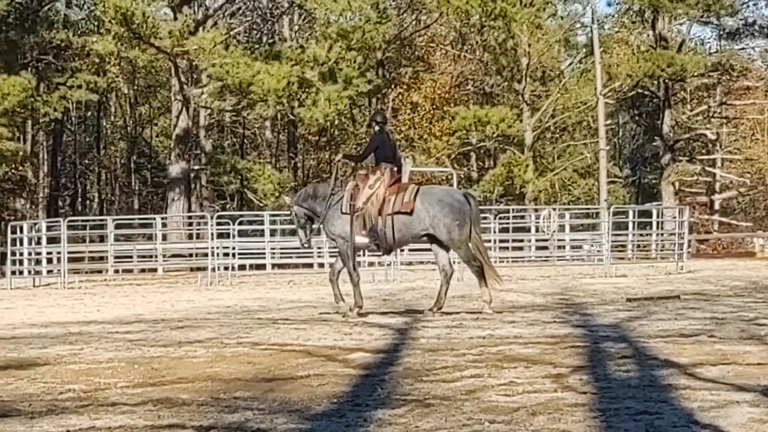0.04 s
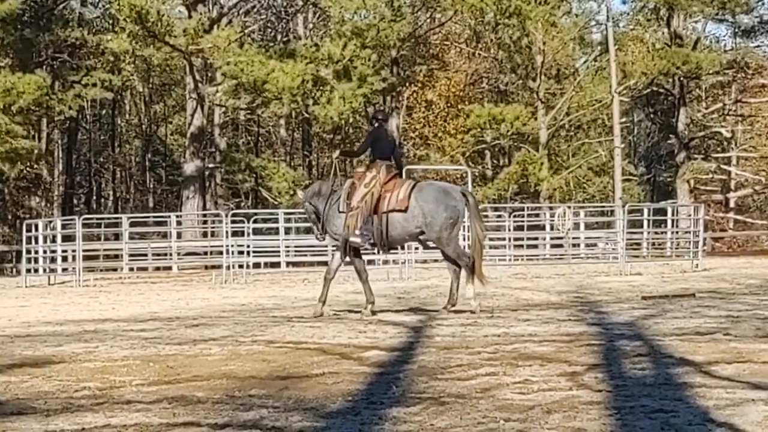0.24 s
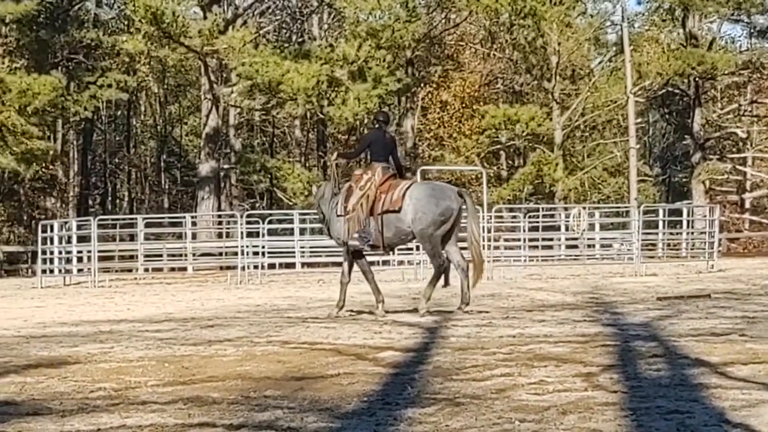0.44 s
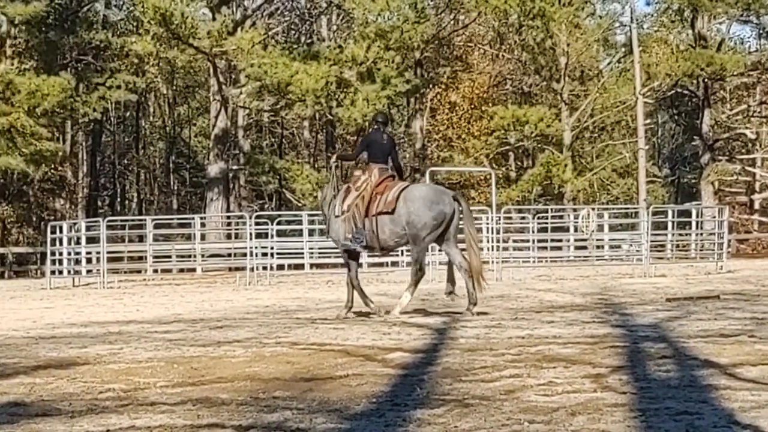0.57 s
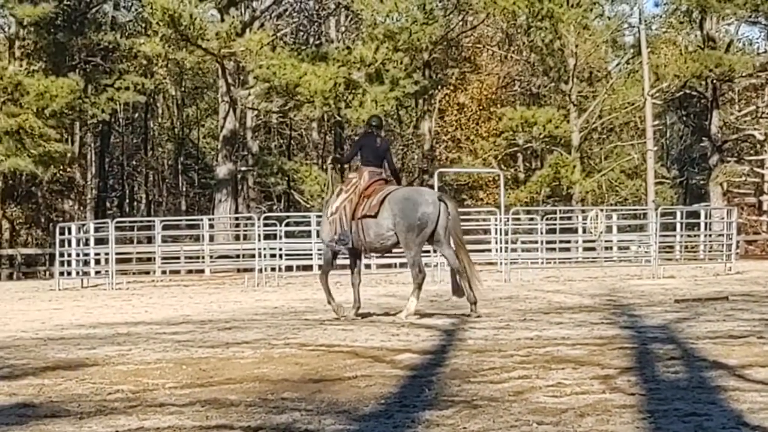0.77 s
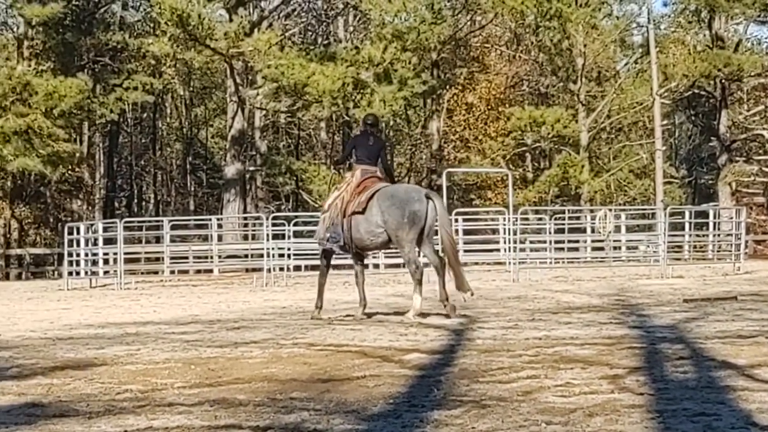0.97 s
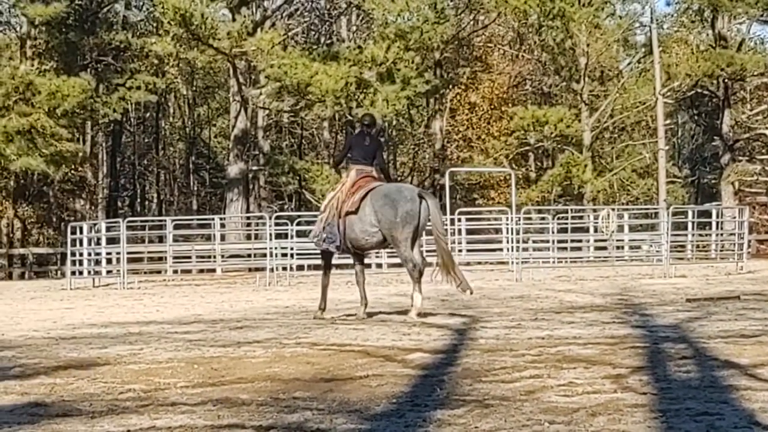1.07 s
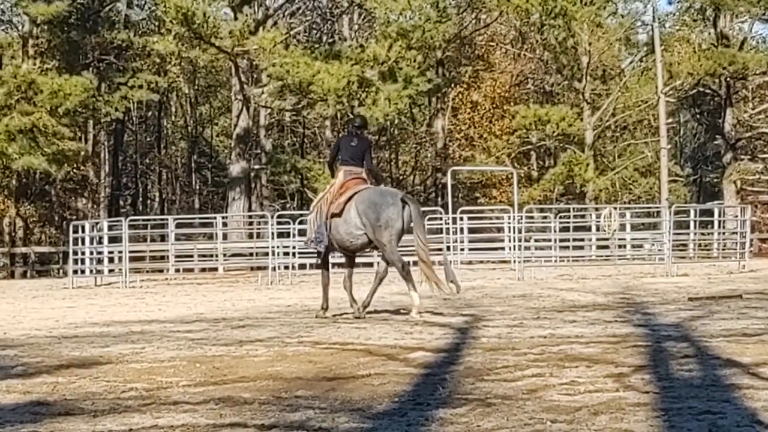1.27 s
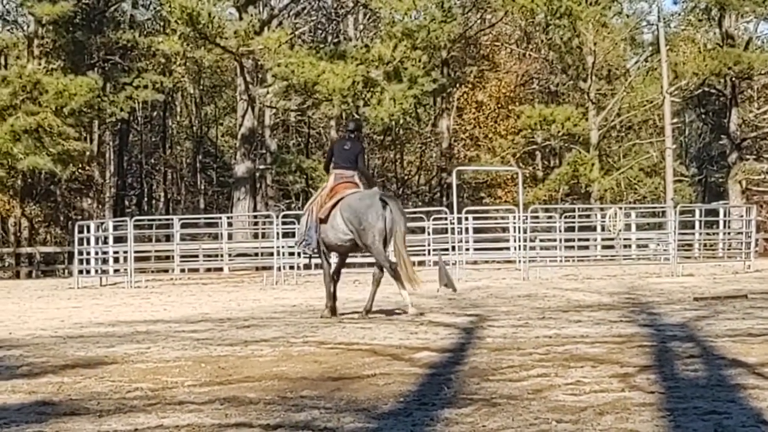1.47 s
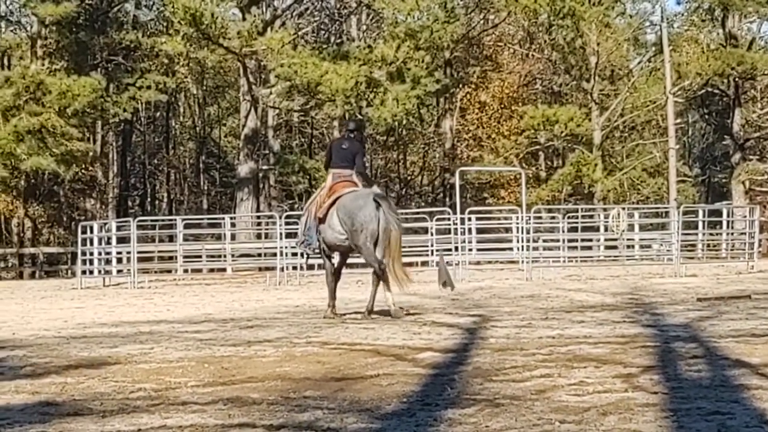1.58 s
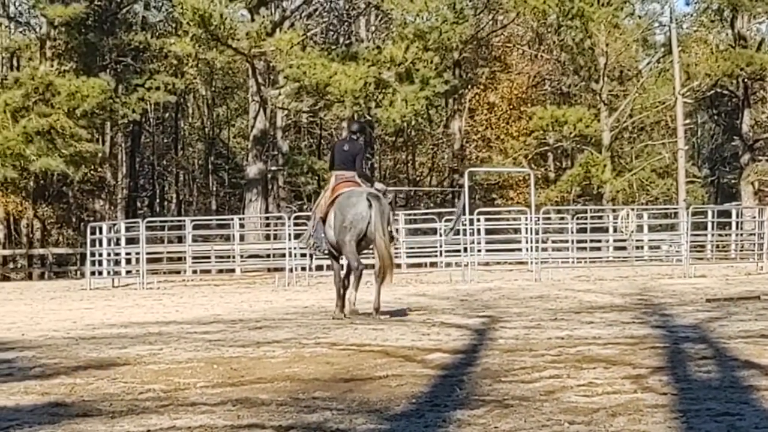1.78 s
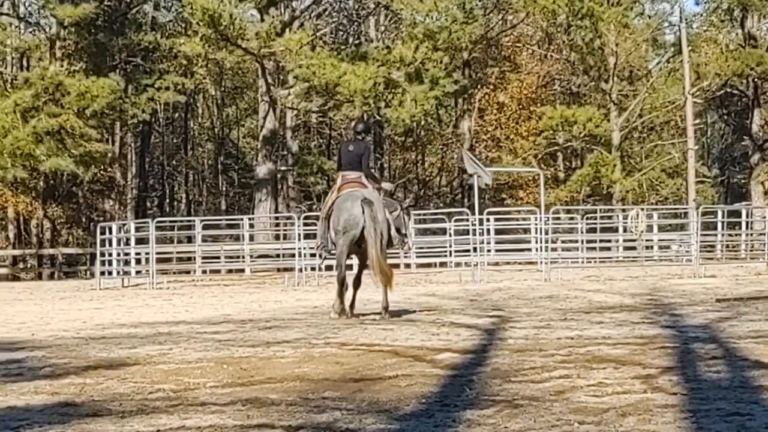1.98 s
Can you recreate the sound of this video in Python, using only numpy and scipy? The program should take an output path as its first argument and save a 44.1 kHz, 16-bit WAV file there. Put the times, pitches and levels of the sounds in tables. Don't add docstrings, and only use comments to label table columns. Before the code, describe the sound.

Low wind buffeting thumps the left microphone while a distant engine drones past, sinking in pitch.

```python
import sys
import numpy as np
from scipy import signal
from scipy.fft import rfft, irfft
from scipy.io import wavfile
from scipy.ndimage import uniform_filter1d

SR = 44100
rng = np.random.default_rng(int(sys.argv[2]) if len(sys.argv) > 2 else 0)


def to_wav(sig):
    pcm = np.clip(np.atleast_2d(sig), -1, 1) * 32767
    pcm = np.round(pcm).astype(np.int16)
    wavfile.write(sys.argv[1], SR, pcm.T)


def convert_level_to_amplitude(level_db):
    exponent = np.asarray(level_db, float) / 20
    return 10 ** exponent


N = 89478
T = np.arange(N) / SR

# t/s, length/s, level/dB, centre f/Hz
EDDIES = [(0.062, 0.036, -49, 111), (0.1, 0.032, -39.0, 113), (0.13, 0.023, -40.5, 156),
          (0.19, 0.034, -41, 142), (0.225, 0.034, -47, 148), (0.265, 0.043, -40.5, 99),
          (0.495, 0.04, -39, 141), (0.575, 0.12, -52.5, 92), (0.67, 0.055, -48.5, 111),
          (0.751, 0.015, -43.5, 121), (0.862, 0.04, -36.5, 123.9), (0.92, 0.039, -34.5, 147),
          (0.96, 0.022, -32, 130), (1.003, 0.047, -42.5, 116), (1.066, 0.034, -45.5, 129),
          (1.108, 0.033, -39, 118), (1.173, 0.048, -38.5, 127), (1.33, 0.025, -43, 124),
          (1.355, 0.026, -37, 90.84), (1.435, 0.04, -44.6, 120), (1.475, 0.088, -52.5, 114),
          (1.536, 0.025, -30.5, 128), (1.571, 0.034, -39, 98), (1.628, 0.037, -43.5, 113),
          (1.7, 0.069, -48, 116.2), (1.774, 0.022, -44, 121.9)]
# t/s, f/Hz, level/dB
ENGINE_NOTE = [(0, 179.3, -59), (.13, 176.3, -58.5), (0.209, 178.7, -53.5), (0.299, 177.2, -60.5),
               (.56, 175, -64.5), (.77, 174.3, -56), (0.918, 170, -59), (1.05, 168.9, -46),
               (1.14, 167, -59), (1.208, 164.2, -45.5), (1.3, 163.3, -60), (1.361, 164.7, -46),
               (1.409, 163.5, -56), (1.488, 163.2, -50.5), (1.581, 161.9, -56.5), (1.64, 162.4, -62.5),
               (1.85, 157, -68), (2.03, 158, -68)]
# f/Hz, density/dB
ROAR_SPECTRUM = [(130, 10.5), (250, -9), (400, -8.5), (650, -4), (1100, -7.5), (1600, -11), (2300, -19),
                 (4000, -36.5)]
# t/s, level/dB
AIR_CARRY = [(0, -0.5), (.35, 0.5), (.8, -1), (1.0, 2.5), (1.2, 0.5), (1.5, -0.1), (1.75, -1.5),
             (2.03, -2.5)]
# f/Hz, level/dB, t60/s, delay/s
BUCKLE_MODES = [(2300, -6, .011, .001), (3300, -10, .008, .0015), (4100, -5, .013, .0012),
                (5400, -10, .006, .001), (6900, -1, .006, 0), (8800, -12, .006, 0), (10400, 1, .007, 0),
                (11800, -5, .01, .0003)]
# t/s, thud level/dB, thud f/Hz, snap level/dB
HOOF_KNOCKS = [
    (.8755, -46, 280, -70),
    (1.3690, -43, 210, -43.5),
]
# t/s, length/s, level/dB
SAND_SWISHES = [
    (.02, .03, -80),
    (.255, .04, -80),
    (.43, .06, -77),
    (.54, .03, -81),
    (1.7, .03, -81),
]
# f/Hz, density/dB
LEFT_HISS = [(1500, -4), (2400, -3), (3700, 2), (4600, -1.5), (6000, 2.4), (7200, -4), (8500, -10.5),
             (13000, -16)]
# f/Hz, density/dB
RIGHT_HISS = [(2000, -25.5), (3300, -5.5), (4200, -7), (5800, -10), (7500, -10.5), (9000, -2.5),
              (11000, -9), (13500, -14)]

EVENNESS = 0.6


def ports(left_db, right_db):
    return convert_level_to_amplitude(np.array([[left_db], [right_db]]))


def rms_one(x):
    return x / np.sqrt(np.mean(x ** 2, axis=-1, keepdims=True) + 1e-20)


def drift(rate_hz):
    r = np.exp(-80 * np.pi * rate_hz / SR)
    slow = signal.lfilter([1], [1, -2 * r, r * r], rng.standard_normal(N // 40 + 2002))[2000:]
    return np.interp(np.arange(N) / 40, np.arange(len(slow)), rms_one(slow - slow.mean()))


def cut(x, hz, kind, order=2):
    return signal.sosfilt(signal.butter(order, hz, kind, fs=SR, output="sos"), x)


def click(s, db):
    return convert_level_to_amplitude(db) * (np.arange(N) == int(s * SR))


def ring(clicks, hz, t60):
    r, w = convert_level_to_amplitude(-60 / (t60 * SR)), 2 * np.pi * hz / SR
    return signal.lfilter([0, np.sin(w)], [1, -2 * r * np.cos(w), r * r], clicks + 1e-18)


def coloured(x, spectrum):
    hz, db = np.transpose(spectrum)
    grid = np.fft.rfftfreq(N, 1 / SR) + 1
    skirt = np.minimum(grid / hz[0], 1) ** 2
    shape = convert_level_to_amplitude(np.interp(np.log(grid), np.log(hz), db))
    return rms_one(irfft(rfft(x) * skirt * shape, N))


def lagged(x):
    return np.interp(T - 0.00039, T, x)


def scattered(x, t60):
    t = T[:SR // 3]
    sparse = rng.standard_normal((2, len(t))) * (rng.random((2, len(t))) < 0.05)
    taps = sparse * convert_level_to_amplitude(-60 * t / t60) * (t > 0.004)
    taps = taps / np.sqrt(np.sum(taps ** 2, axis=1, keepdims=True))
    return signal.fftconvolve(x[None], taps, axes=1)[:, :N]


def eddy(noise, s, length, db, hz):
    spread, body_top_hz, tail_top_hz = 0.32, 226, 400
    grid = np.fft.rfftfreq(len(noise), 1 / SR) + 1
    body = np.exp(-np.log(grid / hz) ** 2 / (4 * spread ** 2)) / (1 + (grid / body_top_hz) ** 6)
    tail = convert_level_to_amplitude(-33 + 0.56 * (db + 39.5)) / (1 + (grid / tail_top_hz) ** 4)
    x = rms_one(irfft(rfft(noise) * (body + tail), len(noise)))
    x = x / (uniform_filter1d(x ** 2, size=700) + 0.05) ** (EVENNESS / 2)
    swell = np.exp(-((np.arange(len(x)) - len(x) / 2) / (0.58 * length * SR)) ** 4)
    level = convert_level_to_amplitude(db) * np.sqrt(np.sum(swell ** 2) / np.sum((swell * x) ** 2))
    out = np.zeros(N + 2 * len(x))
    start = int(s * SR) + len(x) // 2
    out[start:start + len(x)] = level * swell * x
    return out[len(x):len(x) + N]


def turbulence(low_hz, high_hz):
    x = rms_one(cut(rng.standard_normal(N + SR), [low_hz, high_hz], "band")[SR:])
    return rms_one(x / (uniform_filter1d(x ** 2, size=900) + 0.05) ** (EVENNESS / 2))


def wind():
    noises = rng.standard_normal((len(EDDIES), 8192))
    eddies = sum(eddy(noise, *row) for noise, row in zip(noises, EDDIES))
    gust = (rms_one(uniform_filter1d(np.abs(eddies), size=16000)) + 0.3) ** 0.2
    breeze = [gust * convert_level_to_amplitude(db + 1.2 * drift(3.5)) * turbulence(73.6, 184) for db in (-59.5, -62.5)]
    both = eddies * ports(0, -36) + breeze
    return cut(cut(both, 600, "low"), 42, "high", order=3)


def engine_note():
    s, hz, db = np.transpose(ENGINE_NOTE)
    pitch_hz = np.interp(T, s, hz) + 0.8 * drift(12.9)
    phase = 2 * np.pi * np.cumsum(pitch_hz) / SR
    level = np.sqrt(2) * convert_level_to_amplitude(np.interp(T, s, db) + 0.7 * drift(18.0))
    octave = convert_level_to_amplitude(-28 + 2.4 * drift(6.9)) * np.sin(2 * phase)
    return level * (np.sin(phase) + octave)


def engine_roar():
    alike = 0.51
    shared, left, right = coloured(rng.standard_normal((3, N)), ROAR_SPECTRUM)
    common = np.array([shared, lagged(shared)])
    roar = np.sqrt(alike) * common + np.sqrt(1 - alike) * np.array([left, right])
    carry_db = np.interp(T, *np.transpose(AIR_CARRY))
    dull = cut(roar, 2500, "low", order=1)
    roar = dull + (roar - dull) * convert_level_to_amplitude(2.19 * carry_db)
    return roar * convert_level_to_amplitude(-66.5 + carry_db + 0.6 * drift(21.0))


def engine():
    note = engine_note()
    return engine_roar() + [note * convert_level_to_amplitude(-0.04), lagged(note)]


def bird():
    start_s, length_s, bend_s = 0.765, 0.023, 0.0095
    from_hz, to_hz = 5800, 8600
    t = np.clip(T - start_s, 0, length_s)
    hz = to_hz - (to_hz - from_hz) * np.exp(-t / bend_s)
    swell = np.sin(np.pi * (t / length_s) ** 0.75) ** 2
    chip = swell * np.sin(2 * np.pi * np.cumsum(hz) / SR)
    ground = convert_level_to_amplitude(-5) * np.roll(chip, int(0.0055 * SR))
    trees = ports(-7, -4) * scattered(chip, t60=0.65)
    return ports(-63.5, -61) * (chip + ground + trees)


def tack():
    tick = sum(ring(click(0.1424 + late, db), hz, t60) for hz, db, t60, late in BUCKLE_MODES)
    tick = cut(tick, 12500, "low", order=4)
    scatter = convert_level_to_amplitude(-1) * scattered(cut(tick, 8000, "high"), t60=0.13)
    return ports(-58, -55.5) * (tick + scatter)


def knocks():
    thud_t60, snap_hz, snap_t60 = 0.03, 1450, 0.0018
    out = np.zeros(N)
    for s, thud_db, thud_hz, snap_db in HOOF_KNOCKS:
        out -= ring(click(s, thud_db), thud_hz, thud_t60)
        dip = click(s - 0.0004, snap_db) - click(s - 0.0008, snap_db - 3)
        out += ring(dip, snap_hz, snap_t60)
        out += ring(click(s, snap_db - 6), 1.6 * snap_hz, snap_t60)
        out += cut(click(s, snap_db - 8), 3000, "high")
    return cut(out, 120, "high") * ports(-25, 0)


def sand():
    grains = rng.standard_normal((2, N)) * (rng.random((2, N)) < 9000 / SR)
    grains = rms_one(cut(grains, [4000, 11500], "band"))
    power = sum(convert_level_to_amplitude(2 * db) * np.exp(-((T - s) / (0.5 * length)) ** 4) for s, length, db in SAND_SWISHES)
    return np.sqrt(power) * grains * ports(-6, 0)


def hiss():
    left = convert_level_to_amplitude(-72.5) * coloured(rng.standard_normal(N), LEFT_HISS)
    right = convert_level_to_amplitude(-76.5) * coloured(rng.standard_normal(N), RIGHT_HISS)
    return np.array([left, right])


def scene():
    low = wind() + engine()
    left, right = bird() + tack()
    bright = [convert_level_to_amplitude(1.5) * cut(left, 7800, "low"), right]
    return low + bright + knocks() + sand()


def top_cut(x):
    return signal.sosfilt(signal.butter(12, 15745, fs=SR, output="sos"), x)


def record(dry):
    mix = dry + hiss()
    return top_cut(mix)


dry = scene()
out = record(dry)
to_wav(out)
```